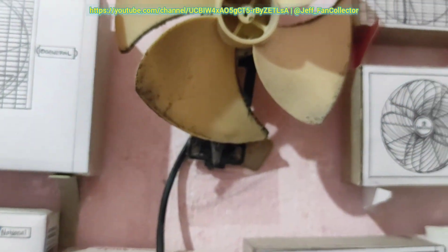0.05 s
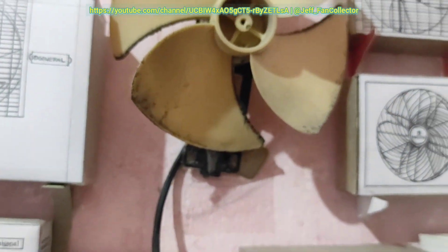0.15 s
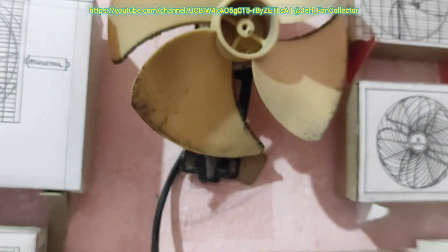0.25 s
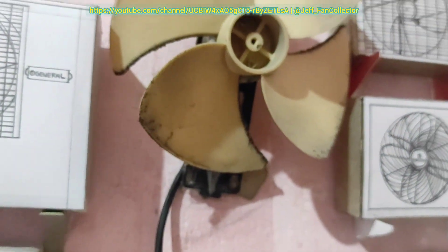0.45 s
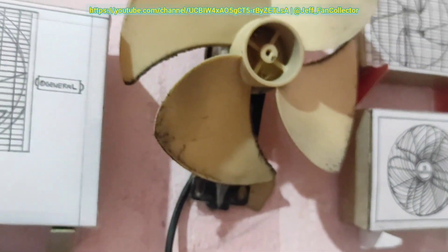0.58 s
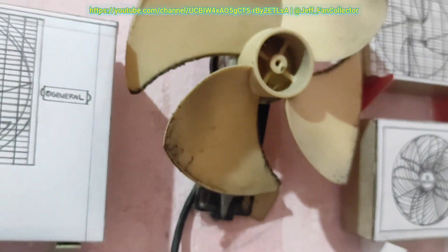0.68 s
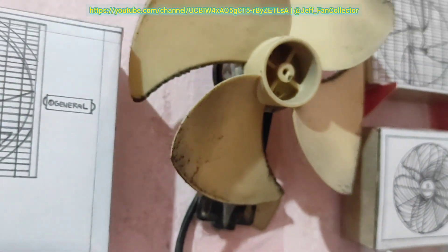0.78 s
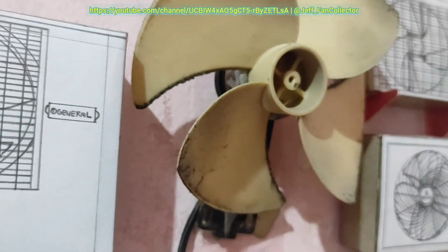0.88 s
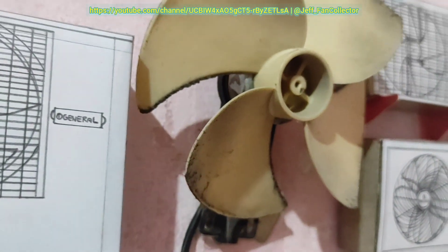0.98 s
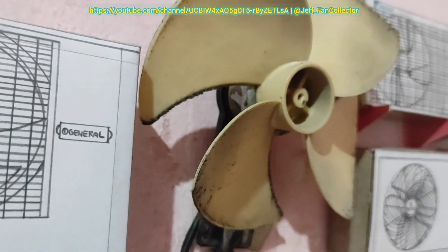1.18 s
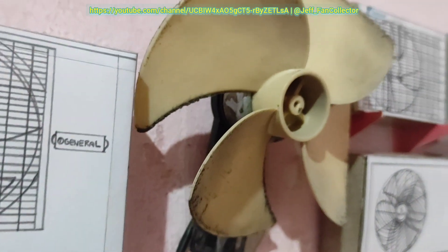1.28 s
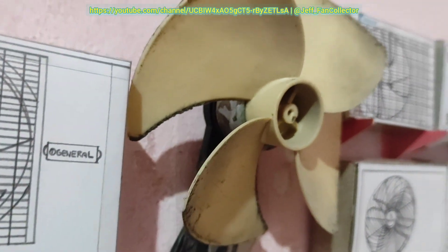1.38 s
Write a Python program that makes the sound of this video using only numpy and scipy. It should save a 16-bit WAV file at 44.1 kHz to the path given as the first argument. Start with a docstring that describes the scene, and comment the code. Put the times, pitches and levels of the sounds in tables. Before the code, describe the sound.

Sharp plastic clicks from a hand gripping a phone, right at the microphone: one click, then three in quick succession. Fainter ticks, light finger brushes and two muffled shuffles follow in a quiet room with faint hiss.

```python
"""Handling a phone in a quiet room

A hand shifts its grip. The case clicks once, then three times in quick succession, among fainter ticks;
each click crosses the shell as a dispersive bending wave (treble first, bass later) and excites the
resonance of the two microphone ports. Fingers slide and brush, the hand bumps the case, and two muffled
shuffles pass over low rumble and faint hiss."""
import sys
import numpy as np
from scipy import signal
from scipy.fft import rfft, irfft
from scipy.io import wavfile

SR = 44100
rng = np.random.default_rng(int(sys.argv[2]) if len(sys.argv) > 2 else 0)


def wrap_up_sound(samples):
    """Save the sound to the file named by the first command line argument, as 16-bit audio."""
    columns = np.atleast_2d(samples).T
    # keep every value between -1 and 1, then stretch to whole-number steps
    tamed = np.clip(columns, -1, 1)
    steps = np.round(tamed * 32767).astype(np.int16)
    wavfile.write(sys.argv[1], SR, steps)


N = 63945
TIME = np.arange(N) / SR
PORT_HZ = 7070  # resonance of the microphone ports
ROOM_CORRELATION = 0.66  # between left and right


def undb(db):
    """Amplitude ratio of a level in decibels."""
    return 10 ** (np.asarray(db) / 20)


def unit(x):
    """Normalisation to rms 1."""
    return x / np.sqrt(np.mean(x ** 2))


def colour(x, spectrum):
    """Minimum-phase filtering through (frequency [Hz], level [dB]) points, by folding the cepstrum."""
    hz, db = np.array(spectrum, float).T
    f = np.maximum(np.fft.rfftfreq(2 * N, 1 / SR), 1)
    gain = undb(np.interp(np.log(f), np.log(hz), db))
    cepstrum = irfft(np.log(gain))
    cepstrum[1:N] *= 2
    cepstrum[N + 1:] = 0
    return irfft(rfft(x, 2 * N) * np.exp(rfft(cepstrum)))[..., :N]


def noise(spectrum):
    """Uncorrelated left and right noise with one spectrum."""
    return unit(colour(rng.standard_normal((2, N)), spectrum))


def blend(pair):
    """Partial coherence: the right channel shares part of the left."""
    left, right = pair
    return np.array([left, ROOM_CORRELATION * left + np.sqrt(1 - ROOM_CORRELATION ** 2) * right])


def sides(left_db=0, right_db=0):
    """Level difference between the channels, as two gains."""
    return undb([[left_db], [right_db]])


def swell(at, length, power=2):
    """Gaussian envelope about a moment; a higher power flattens the top and steepens the sides."""
    return np.exp(-(2 * (TIME - at) / length) ** power)


def swells(events, power=2):
    """Superposed envelopes, one for each (time [s], length [s], level [dB])."""
    return sum(undb(db) * swell(at, length, power) for at, length, db in events)


def ring(at, hz, t60):
    """Free decay of a struck mode, falling 60 dB in t60 seconds."""
    age = np.maximum(TIME - at, 0)
    return np.sin(2 * np.pi * hz * age) * np.exp(-np.log(1000) * age / t60)


def mode(at, hz, t60):
    """Impulse response of a damped mode with unit gain at resonance."""
    return ring(at, hz, t60) * 2 * np.log(1000) / (t60 * SR)


def resonate(x, hz, width_hz):
    """Forced response of a second-order resonator."""
    return signal.lfilter(*signal.iirpeak(hz, hz / width_hz, fs=SR), x)


def bend(x, travel_s=0.001616):
    """Bending-wave dispersion: delay goes as 1/sqrt(f), and is travel_s at 1 kHz."""
    f = np.fft.rfftfreq(2 * N, 1 / SR)
    cycles = travel_s * np.sqrt(1000) * (2 * np.sqrt(f) - f / np.sqrt(PORT_HZ))  # less the delay at PORT_HZ
    return irfft(rfft(x, 2 * N) * np.exp(-2j * np.pi * cycles))[:N]


def slips(per_second=150):
    """Stick-slip friction: the tightening grip sheds tiny uneven pulses around the port resonance."""
    gap, size = rng.standard_normal((N // 100, 2)).T
    times = np.cumsum(np.exp(0.6 * gap)) / per_second
    pulses = np.bincount((times * SR).astype(int), undb(3 * size), N)[:N]
    return undb(-34.5) * swell(at=0.461, length=0.092) * resonate(pulses, PORT_HZ, width_hz=4500)


# Snaps of the case; a softer contact has a lower cutoff
# (time [s], tick [dB], knock [dB], shell ring [dB], crack [dB], tick cutoff [Hz])
CASE_SNAPS = [(0.2251, 1, 3, 16.5, -5.5, 16500), (0.4594, -30, -39, -45, -41, 9000),
              (.4850, -14.5, -19.5, -19, -34, 10000), (0.4907, -10.5, -25, 3.5, -9, 13700),
              (0.4992, -2, -6, 3, -12, 11300), (0.6207, -40, -62, -51, -50, 9000),
              (0.6542, -38, -35, -32, -50, 8950), (0.7185, -26.5, -26, -15, -33, 3500),
              (0.8466, -33, -36, -29, -38, 1640), (.8585, -34.5, -53, -30, -44, 2330),
              (1.1565, -41, -37, -45, -46, 8900)]
# Response of each port to the tick and to the knock (frequency [Hz], level [dB])
LEFT_TICK_RESPONSE = [(300, -8), (1300, -10.5), (2700, -1.5), (3500, -3.5), (4600, -16.5), (6500, -3),
                      (8200, -17.5), (10500, -47), (16000, -59)]
RIGHT_TICK_RESPONSE = [(300, -25), (1200, 1), (2600, -9), (3200, -4.5), (4800, -1.5), (6400, 3.5),
                       (7400, 15.5), (8500, 0), (10500, -21), (12000, -23), (16000, -20)]
LEFT_KNOCK_RESPONSE = [(40, 14.5), (150, -6.5), (400, 11), (650, 7.5), (1000, -0.5), (3000, -14.5),
                       (9000, -40)]
RIGHT_KNOCK_RESPONSE = [(40, -17), (150, -33), (400, -12), (650, 1.5), (1000, -27), (3000, -55),
                        (9000, -82)]
def clicks(node_hz=2610, node_width_hz=305, left_lag_s=0.0001):
    """Impulsive excitation: each snap gives a bright tick, a dull knock, a shell ring and a crack."""
    tick = slips()
    knock, shell, crack = np.zeros((3, N))
    for at, tick_db, knock_db, ring_db, crack_db, cutoff_hz in CASE_SNAPS:
        snap = signal.unit_impulse(N, int(at * SR))
        tick += undb(tick_db) * signal.sosfilt(signal.butter(4, cutoff_hz, fs=SR, output="sos"), snap)
        knock += undb(knock_db) * snap
        shell += undb(ring_db) * mode(at, hz=880, t60=0.022)
        crack += undb(crack_db) * mode(at, hz=2170, t60=0.0033)
    # The shell mode rocks the two ports in antiphase.
    left = colour(tick, LEFT_TICK_RESPONSE) + colour(knock, LEFT_KNOCK_RESPONSE) - shell
    right = colour(tick, RIGHT_TICK_RESPONSE) + colour(knock, RIGHT_KNOCK_RESPONSE) + shell
    ports = np.array([left, right]) + crack * sides(right_db=-6.5)
    node = signal.iirnotch(node_hz, node_hz / node_width_hz, fs=SR)  # the case passes almost nothing here
    left, right = signal.lfilter(*node, ports)
    return np.array([np.roll(bend(left), int(left_lag_s * SR)), bend(right)])  # longer path to the left


# Soft impacts of the hand (time [s], thud [dB], hollow ring [dB])
HAND_BUMPS = [(.001, -36.5, -24.5), (0.232, -31.5, -30), (0.507, -37, -46), (0.5126, -25, -35)]
def bumps():
    """Damped modes: a bump near the left port excites a deep thud and a hollow ring of the case."""
    thud = sum(undb(db) * ring(at, hz=41, t60=0.029) for at, db, _ in HAND_BUMPS)
    hollow = sum(undb(db) * ring(at, hz=171, t60=0.03) for at, _, db in HAND_BUMPS)
    return -(thud + hollow) * sides(right_db=-22)


# Rattles after the clicks (time [s], length [s], level [dB])
RATTLES = [(0.235, 0.021, -48), (0.513, 0.004, -46.5)]
# Their spectrum (frequency [Hz], level [dB])
RATTLE_SPECTRUM = [(100, -9), (350, -5.5), (900, 3), (1300, -23.5), (2200, -20), (4000, -63)]
def chatter():
    """Contact chatter: the settling shell gives brief bursts of dull noise."""
    return noise(RATTLE_SPECTRUM) * swells(RATTLES) * sides(right_db=-3)


# Creaks of the case (time [s], length [s], level [dB])
CASE_CREAKS = [(0.231, .02, -46), (0.475, 0.015, -58.5), (0.4953, 0.0038, -37.5)]
# Their spectrum (frequency [Hz], level [dB])
CREAK_SPECTRUM = [(300, -48), (1000, 2.5), (3000, -13), (5000, -13.5), (7300, 3), (9000, -11.5),
                  (11000, -14), (15000, -27)]
def creaks():
    """Friction under load: the gripped case creaks in short bursts of noise."""
    return noise(CREAK_SPECTRUM) * swells(CASE_CREAKS) * sides(left_db=-5.5)


# Finger strokes (time [s], length [s], level [dB])
FINGER_STROKES = [(0.354, 0.03, -55), (0.701, 0.025, -58), (0.856, 0.049, -72.5)]
# Their spectrum (frequency [Hz], level [dB])
BRUSH_SPECTRUM = [(100, -29), (800, 3), (2500, -2.5), (4500, -8.5), (7200, 1.5), (9500, -11.5),
                  (15000, -36)]
def brushes():
    """Friction noise: skin brushes the case, starting and stopping quickly and holding in between."""
    return noise(BRUSH_SPECTRUM) * swells(FINGER_STROKES, power=4) * sides(left_db=-9)


# Envelope of the sliding finger (time [s], level [dB])
SLIDE_ENVELOPE = [(.03, -67), (0.111, -66), (0.172, -54.5), (.21, -68), (0.249, -73.5), (.30, -74),
                  (.33, -110)]
# Its spectrum (frequency [Hz], level [dB])
SLIDE_SPECTRUM = [(300, -12), (1000, -11), (2200, -5.5), (3200, 0), (4300, -3.5), (6000, 1), (7500, 4.5),
                  (10000, -17.5), (15000, -38)]
def slide(attack_s=0.05):
    """Sliding friction: a light swish with a faint narrow-band note peaks just before the first click."""
    swish = noise(SLIDE_SPECTRUM) * undb(np.interp(TIME, *np.array(SLIDE_ENVELOPE).T))
    note = unit(resonate(rng.standard_normal((2, N)), hz=1030, width_hz=130))
    squeak = undb(-65.5) * swell(at=0.077, length=0.22) * note
    return (swish + squeak) * np.minimum(TIME / attack_s, 1)


# Movements of the holder (time [s], length [s], scuff [dB], thump [dB])
WEIGHT_SHIFTS = [(0.658, 0.11, -59.5, -55), (1.099, 0.13, -60, -49)]
# Spectra of the scuff and the thump (frequency [Hz], level [dB])
SCUFF_SPECTRUM = [(120, -20), (260, -2.5), (380, 6.5), (650, -9.5), (1300, -31), (4000, -51), (12000, -79)]
THUMP_SPECTRUM = [(25, -23), (65, 0.5), (150, 3), (220, -7), (400, -31), (2000, -65), (8000, -96)]
def shuffles():
    """Amplitude-modulated noise: a dull scuff and a low thump swell as the holder shifts weight."""
    out = np.zeros((2, N))
    for at, length, scuff_db, thump_db in WEIGHT_SHIFTS:
        scuff = undb(scuff_db) * noise(SCUFF_SPECTRUM)
        thump = undb(thump_db) * noise(THUMP_SPECTRUM)
        out += swell(at, length) * (scuff + thump)
    return blend(out) * sides(right_db=-5)


# Spectra of the room's rumble and the microphones' self-noise (frequency [Hz], level [dB])
RUMBLE_SPECTRUM = [(20, -2), (45, -4.5), (75, 4), (110, -9.5), (190, -1.5), (250, -14.5), (450, -21.5),
                   (900, -28), (2000, -55), (8000, -64)]
HISS_SPECTRUM = [(200, 8), (1000, 3), (2000, 0.5), (4000, -4), (5500, -3), (7300, 4.5), (9500, -10),
                 (12500, -12), (13300, -30), (16000, -29)]
def room():
    """Stationary noise floor: partly coherent room rumble and incoherent microphone hiss."""
    rumble = undb(-54.5) * blend(noise(RUMBLE_SPECTRUM)) * sides(right_db=-6.5)
    hiss = undb(-70.5) * noise(HISS_SPECTRUM)
    return rumble + hiss


def scene():
    """Linear superposition of the handling sounds and the quiet room."""
    return clicks() + bumps() + chatter() + creaks() + brushes() + slide() + shuffles() + room()


def record(dry, cutoff_hz=16500):
    """Band limiting: a steep elliptic low-pass removes the highest treble."""
    return signal.sosfilt(signal.ellip(8, 0.2, 70, cutoff_hz, fs=SR, output="sos"), dry)


dry = scene()
out = record(dry)
wrap_up_sound(out)
```